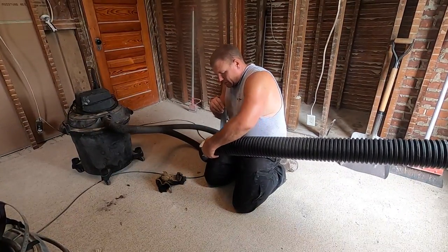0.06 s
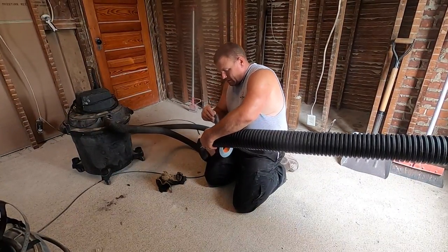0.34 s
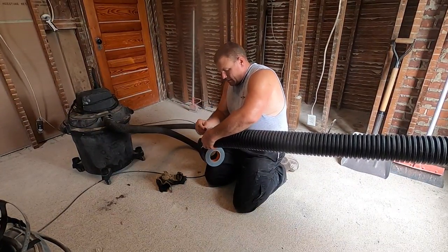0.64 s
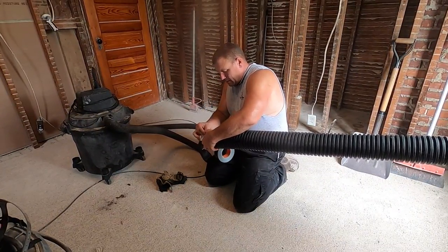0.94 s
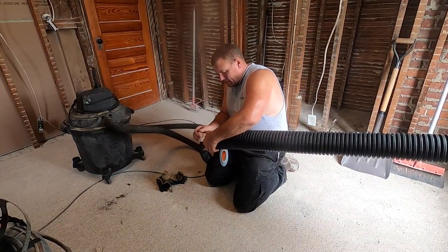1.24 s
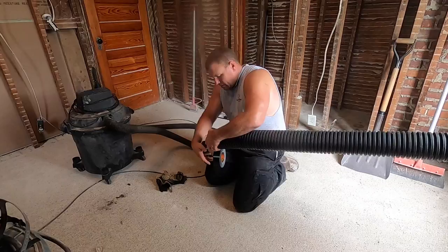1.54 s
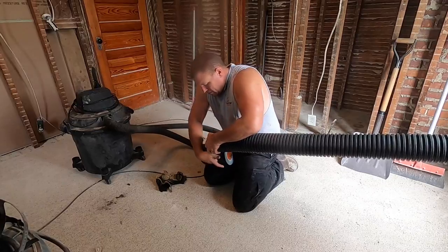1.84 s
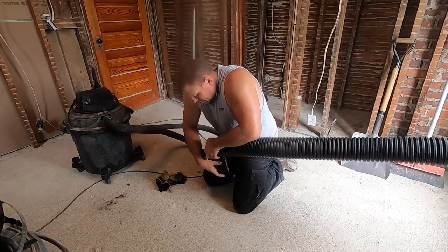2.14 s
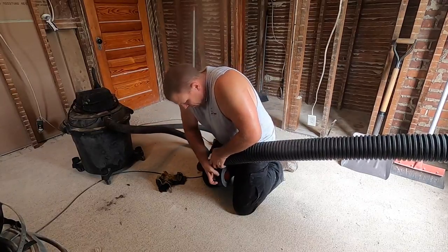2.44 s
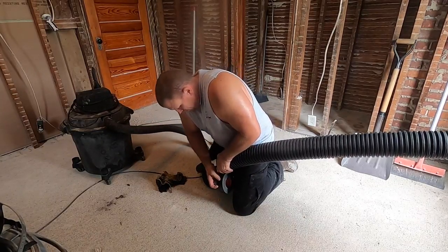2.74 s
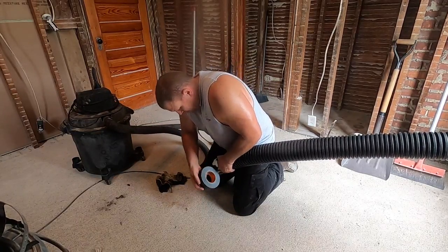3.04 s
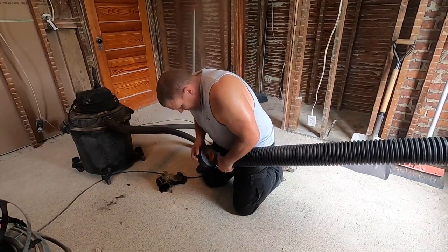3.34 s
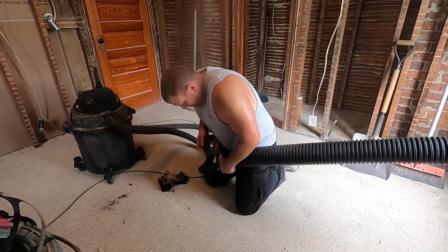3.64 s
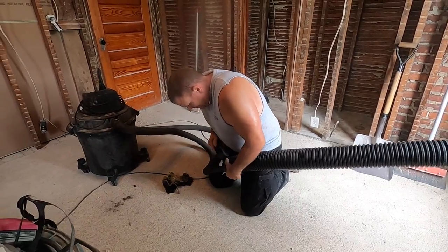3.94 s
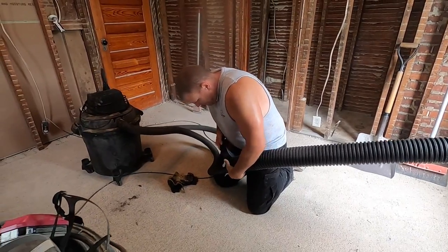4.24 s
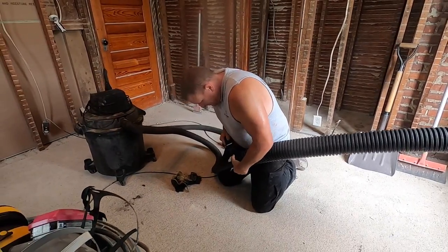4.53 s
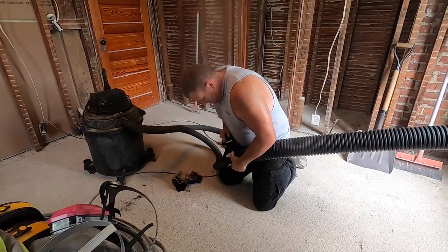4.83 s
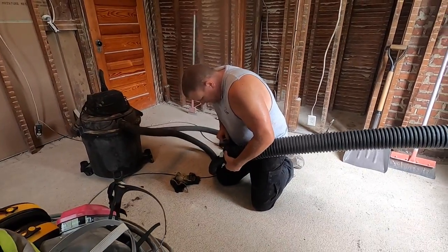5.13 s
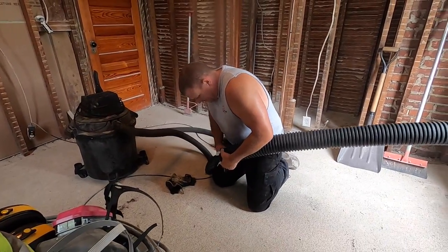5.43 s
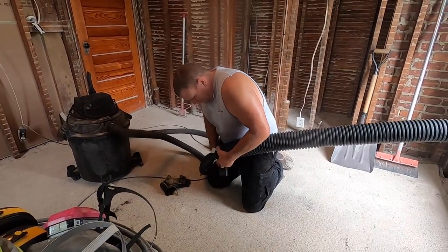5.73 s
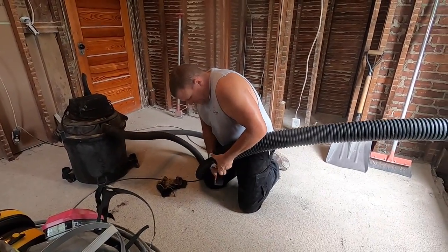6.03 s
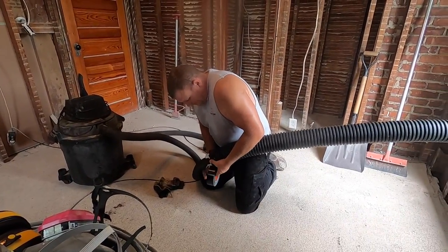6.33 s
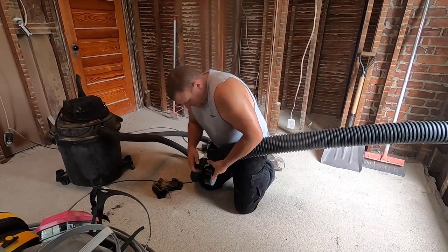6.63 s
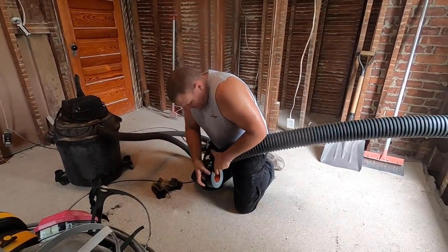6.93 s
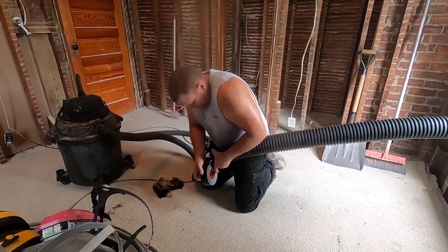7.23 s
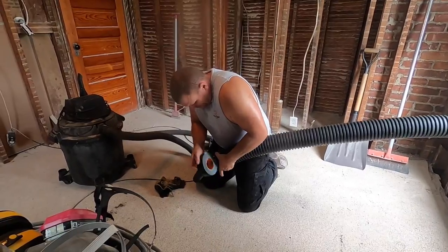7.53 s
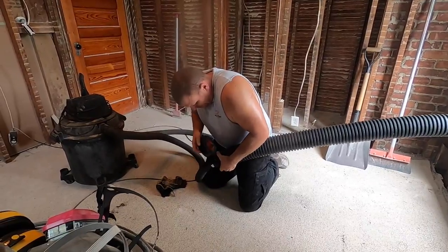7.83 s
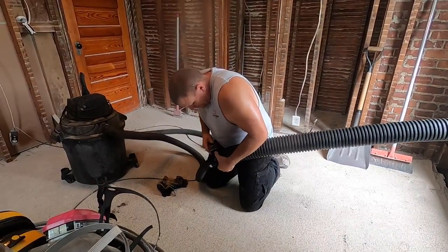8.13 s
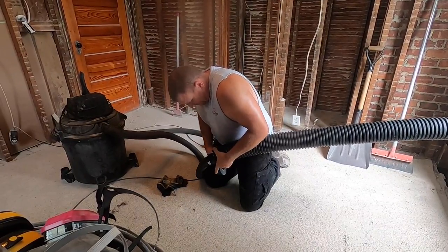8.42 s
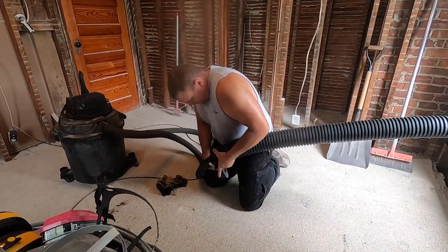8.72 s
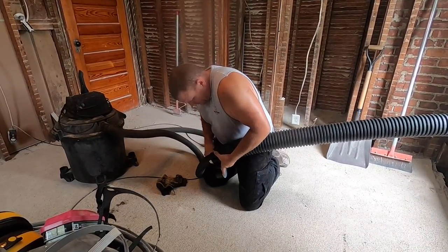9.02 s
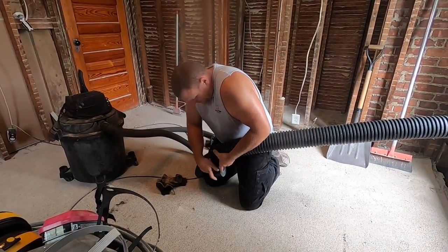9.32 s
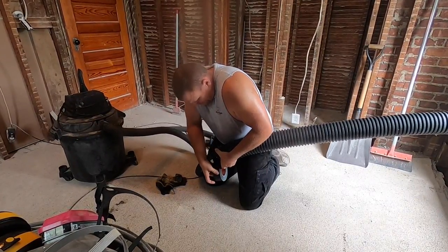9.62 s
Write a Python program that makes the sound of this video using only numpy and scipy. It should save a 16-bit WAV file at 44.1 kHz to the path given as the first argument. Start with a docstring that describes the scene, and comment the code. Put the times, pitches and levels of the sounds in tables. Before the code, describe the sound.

Duct tape is wound round the joint of a vacuum hose and a ribbed plastic pipe. Quiet rustling, scuffs and picking clicks come first, then uneven clusters of brief rips and dry snaps, mixed with dull knocks and a low rumble from the shifting pipe. The last rips are weaker, and the handling settles into light clicks and bumps. The microphone is fairly near, in a quiet, slightly echoing room.

```python
"""Duct tape is wound round the joint of a vacuum hose and a corrugated plastic pipe in a bare room.
First hands and clothes rustle, the long pipe rumbles and bumps, and fingers pick at the roll.
From 2.7 s the tape comes off in short rips: bursts of tiny slips that ring the free strip and the pipe,
with snaps and handling in between. At 8.3 s the tape squeaks faintly on the plastic, just ahead of
the last rips. The final second settles into soft bumps, clicks and rustle."""
import sys
import numpy as np
from scipy import signal
from scipy.fft import rfft, irfft, next_fast_len
from scipy.io import wavfile

SR = 44100
rng = np.random.default_rng(int(sys.argv[2]) if len(sys.argv) > 2 else 0)


def file_out(sig):
    """Save sig as 16-bit WAV at sys.argv[1]."""
    # one column per channel
    cols = np.atleast_2d(sig).T
    # limit, then scale
    lim = np.clip(cols, -1, 1)
    pcm = np.round(lim * 32767).astype(np.int16)
    wavfile.write(sys.argv[1], SR, pcm)


N = 426447
T = np.arange(SR // 6) / SR  # time within one hit [s]
SLOW = np.arange(0, N, 64) / SR  # time for slow envelopes [s]


def amp(db):
    """Decibels to gain."""
    return 10 ** (np.asarray(db) / 20)


def unit(x):
    """Scale to rms 1."""
    return x / np.sqrt(np.mean(x ** 2) + 1e-20)


def lasting(x, seconds):
    """Scale to the energy of a sound of rms 1 that lasts so long."""
    return x * np.sqrt(seconds * SR / (np.sum(x ** 2) + 1e-20))


def along(points, hz):
    """Read a curve of (frequency, value) points on a log frequency axis."""
    freqs, values = np.transpose(points)
    return np.interp(np.log(hz + 1), np.log(freqs), values)


def wobble(rate):
    """A random modulator that ramps to a new value rate times a second."""
    return np.interp(np.arange(N) * rate / SR, np.arange(4096), rng.standard_normal(4096))


def held(s, length, rise, fall_db_per_s):
    """An attack, hold and release envelope from time s."""
    attack = np.clip((SLOW - s) / rise, 0, 1)
    return attack * amp(-fall_db_per_s * np.maximum(SLOW - s - length, 0))


def swell(middle, length, fade_db):
    """An envelope that peaks at its middle, with its ends fade_db lower."""
    return amp(-fade_db * np.minimum((2 * (SLOW - middle) / length) ** 2, 20))


def together(rest_db, envelopes):
    """Slow envelopes added in power over a resting level, one value per sample."""
    power = amp(rest_db) ** 2 + sum(e ** 2 for e in envelopes)
    return np.interp(np.arange(N) / SR, SLOW, np.sqrt(power))


def filtered(x, response):
    """EQ x with a response given as a function of frequency."""
    n = x.shape[-1]
    size = next_fast_len(n + SR // 10, True)
    return irfft(rfft(x, size) * response(np.fft.rfftfreq(size, 1 / SR)), size)[..., :n]


def causal(spectrum, size=2048):
    """The tightest (minimum-phase) impulse response with this spectrum."""
    gain = amp(along(spectrum, np.fft.rfftfreq(size, 1 / SR)))
    cepstrum = irfft(np.log(gain))
    cepstrum[1:size // 2] *= 2
    cepstrum[size // 2 + 1:] = 0
    return irfft(np.exp(rfft(cepstrum)))


def through(x, impulse):
    """Play x through an impulse response."""
    return signal.fftconvolve(x, impulse)[:len(x)]


def resonance(f, hz, width):
    """Response of one damped mode."""
    return 1j * f * width / (hz * hz - f * f + 1j * f * width)


def ring(x, modes, top_hz=3000):
    """Play x through a body with these modes; its soft wall passes little treble."""
    def body(f):
        return sum(amp(db) * resonance(f, hz, width) for hz, width, db in modes) / (1 + 1j * f / top_hz)
    return filtered(x, body)


def gliding(x, hz, width_hz):
    """Play x through a swept resonance."""
    turn = np.exp(2j * np.pi * np.cumsum(hz) / SR)
    pole = np.exp(-np.pi * width_hz / SR)
    return np.real(turn * signal.lfilter([1], [1, -pole], x / turn))


def scattered(count, scatter_db):
    """Random gains around 1, without extreme spikes."""
    return amp(scatter_db * np.clip(rng.standard_normal(count), -2, 2))


def slip_train(rate, scatter_db, count=600):
    """Sudden slips of uneven size and direction, about rate a second, the first at time 0."""
    gaps = rng.gamma(2, .5, count) / rate
    onsets = ((np.cumsum(gaps) - gaps[0]) * SR).astype(int)
    slips = scattered(count, scatter_db) * rng.choice([-1, 1, 1], count)
    return np.bincount(onsets, slips, len(T))[:len(T)]


def add(out, s, x):
    """Mix x into out from time s on."""
    part = out[:, round(s * SR):][:, :x.shape[1]]
    part += x[:, :part.shape[1]]


# Stereo width of diffuse sound: (frequency [Hz], side over mid [dB])
WIDTH = [(100, -21.5), (250, -14.5), (500, -7.5), (1000, -9), (2000, -3), (4000, -4.5), (10000, 1.5)]


def diffuse(pair):
    """Two unrelated signals as a close microphone pair hears them: narrow bass, wide treble."""
    side = filtered(pair[1], lambda f: amp(along(WIDTH, f)))
    return np.array([pair[0] + side, pair[0] - side])


def noise(spectrum, grit_db=0):
    """A stereo noise bed with its mid at rms 1; grit breaks it into small grains."""
    grains = np.repeat(amp(grit_db * rng.standard_normal(N // 64 + 1)), 64)[:N]
    source = grains * rng.standard_normal((2, N))
    return diffuse(unit(filtered(source, lambda f: amp(along(spectrum, f)))))


# Reverb of the bare room: (frequency [Hz], time to fall 60 dB [s])
ROOM = [(150, .42), (500, .32), (1400, .29), (3700, .29), (9700, .27)]


def in_room(x, wet_db, build_s=0.0011):
    """The direct sound plus a dense tail from floor and walls, at the energy of the dry sound."""
    hz, t, bands = signal.stft(rng.standard_normal((2, SR // 4)), SR, nperseg=256)
    decay = amp(-60 * t / along(ROOM, hz)[:, None])
    tail = signal.istft(bands * decay, SR, nperseg=256)[1]
    tail *= 1 - np.exp(-(np.arange(tail.shape[1]) / SR / build_s) ** 2)
    impulse = amp(wet_db) * diffuse(tail / np.linalg.norm(tail[0]))
    impulse[:, 0] += 1
    heard = signal.fftconvolve(x[None], impulse, axes=1)
    return heard * np.linalg.norm(x) / np.linalg.norm(heard.mean(0))


# Colour of the still room: (frequency [Hz], level [dB])
ROOM_TONE_EQ = [(25, -6.5), (60, -15), (100, -15.5), (220, -4), (400, -19), (800, -19), (1200, -18),
                (3000, -32.5), (7000, -32.5), (10000, -49), (15000, -62)]


def room_tone(db=-74):
    """The faint, steady hush of the room."""
    return amp(db) * noise(ROOM_TONE_EQ)


# Colour of one tiny catch, in a crinkle or a scuff: (frequency [Hz], level [dB])
GRIT_EQ = [(300, -21.5), (800, -6), (1500, 3), (3000, -3.5), (5000, -3.5), (8000, -5.5), (10500, -21.5),
           (15500, -32)]


def crinkles(count=200, scatter_db=5):
    """Folds of tape and cloth flick over at random moments."""
    flicks = np.bincount(rng.integers(0, N, count), scattered(count, scatter_db), N)
    return in_room(unit(through(flicks, causal(GRIT_EQ))), wet_db=6.5)[:, :N]


# Colour of rubbing cloth: (frequency [Hz], level [dB])
CLOTH_EQ = [(240, -22), (400, 2), (481, -5), (569, -1), (653, -5), (847, -7.5), (1020, 2), (1100, 0),
            (1820, 2), (5820, -7.5), (7910, -18), (12100, -34.5), (14400, -52), (15500, -43.5)]
# Strokes of hands and clothes: (middle time [s], length [s], level [dB])
RUBS = [(0.135, 0.51, -59), (0.653, 0.42, -71), (1.03, 0.36, -67.5), (1.718, 0.42, -63.5),
        (2.099, 0.19, -65), (2.518, 0.47, -53), (2.86, .2, -65), (3.23, 0.26, -59), (3.476, .2, -67.5),
        (3.857, 0.36, -60), (4.394, 0.49, -64), (4.652, 0.23, -60), (4.895, 0.23, -62), (5.335, 0.78, -64),
        (5.865, 0.24, -60), (6.148, 0.31, -61), (6.346, 0.44, -69.5), (6.796, 0.102, -68.5),
        (6.928, 0.21, -57.5), (7.214, 0.21, -56), (8.322, 0.28, -60.5), (8.88, 0.24, -63),
        (9.62, 0.21, -65)]


def rustle(idle_db=-77.5, crinkle_db=-7):
    """Hands and clothes brush over tape and pipe: swells of fluttering, crinkly noise."""
    strokes = together(idle_db, (amp(db) * swell(s, length, fade_db=13.5) for s, length, db in RUBS))
    flutter = amp(0.81 * wobble(49))
    texture = noise(CLOTH_EQ, grit_db=1.5) + amp(crinkle_db) * crinkles()
    return strokes * flutter * texture


# Colours of the pipe's sub-bass sway and of its ribs' rumble: (frequency [Hz], level [dB])
SWAY_EQ = [(12, 2.5), (27, 4.5), (42, -6.5), (58, 0.5), (78, -16), (110, -20), (250, -89.5)]
RUMBLE_EQ = [(50, -20.5), (90, -8.5), (130, 5.5), (180, 0), (225, -2.5), (290, -0.5), (370, -13.5),
             (600, -27.5), (1500, -69)]
# Shoves that shift the pipe: (time [s], length [s], sway level [dB], rumble level [dB])
SHOVES = [(0.032, 0.2, -40, -54.5), (0.418, 0.078, -48.5, -76), (.75, 0.51, -56, -67),
          (1.22, 0.055, -46, -72), (1.497, 0.28, -54.5, -87), (2.288, 0.54, -52.5, -60),
          (2.961, 0.34, -38.5, -50), (3.59, .18, -40, -49.5), (4.198, 0.15, -37, -46),
          (4.442, 0.052, -45.5, -59), (4.654, .29, -39.5, -47.5), (5.162, 0.062, -36, -42.5),
          (5.58, 0.23, -36.5, -45), (5.84, 0.2, -42.5, -49.5), (6.863, 0.17, -64, -62.5),
          (7.239, 0.11, -33, -38), (7.599, 0.49, -43, -52), (8.443, 0.089, -48, -62),
          (8.937, 0.071, -36.5, -47.5), (9.169, 0.036, -60.5, -56)]


def pipe_shoves(rest_sway_db=-61, rest_rumble_db=-71.5):
    """The long pipe sways, slow to start and to settle; its dragging ribs rumble and stop sooner."""
    sways, drags = [], []
    for s, length, sway_db, rumble_db in SHOVES:
        sways.append(amp(sway_db) * held(s, length, rise=0.064, fall_db_per_s=87.5))
        drags.append(amp(rumble_db) * held(s, length, rise=0.02, fall_db_per_s=119))
    sway = together(rest_sway_db, sways) * noise(SWAY_EQ)
    rumble = together(rest_rumble_db, drags) * amp(0.5 * wobble(45)) * noise(RUMBLE_EQ)
    return sway + rumble


# Hollow body of the pipe, also rung by snaps and rips: (frequency [Hz], bandwidth [Hz], level [dB])
PIPE_MODES = [(217, 7.5, -.5), (267.4, 31, -1), (366, 114, -0.5), (433.6, 21, -1), (488, 39, -1),
              (576, 53, -2), (639, 16, -5.5), (872, 12, -6)]
# Dull bumps of the pipe against hand and knee: (time [s], level [dB], pitch [Hz])
BUMPS = [(.071, -43.5, 119), (.146, -45.5, 205), (1.765, -60.5, 205), (2.965, -31.5, 132),
         (3.701, -48, 128), (4.218, -32, 118), (4.683, -40.5, 139), (4.814, -39, 128), (4.975, -40.5, 167),
         (5.933, -33, 144), (7.162, -44.5, 189), (7.295, -27.5, 150), (8.371, -35.5, 233), (8.73, -50, 167),
         (8.956, -40.5, 168), (9.005, -36.5, 124), (9.183, -49, 189.5)]


def bumps(cues, decay_s=0.017, rise_s=0.0028, breadth=0.58, ring_db=-1):
    """A soft shove makes the pipe wall boom briefly and stirs its lowest modes."""
    out = np.zeros((2, N))
    for s, db, hz in cues:
        shove = rng.standard_normal(len(T)) * np.exp(-T / decay_s) * (1 - np.exp(-T / rise_s))
        boom = filtered(shove, lambda f: resonance(f, hz, breadth * hz) ** 2)
        bump = lasting(boom + amp(ring_db) * ring(boom, PIPE_MODES), 0.018)
        add(out, s, in_room(amp(db) * bump, wet_db=-7.5))
    return out


# Colour of a snap: (frequency [Hz], level [dB])
SNAP_EQ = [(150, -9), (500, 7.5), (1400, 0.5), (3500, 2), (5000, -2.5), (8000, -5), (10500, -15),
           (15500, -31.5)]
# Single snaps of the tape and clicks of the pipe's ribs: (time [s], level [dB], pitch [Hz])
SNAPS = [(.484, -43.5, 3500), (.599, -44, 2500), (.678, -37, 1700), (.815, -33, 1900), (1.01, -41, 1900),
         (1.098, -28.5, 2800), (1.277, -39.5, 2400), (1.68, -26.5, 2870), (2.252, -41, 1900),
         (3.12, -38, 1500), (3.249, -20.5, 2600), (3.967, -21.5, 3500), (3.99, -22, 900),
         (4.261, -19.5, 1850), (4.905, -35.5, 3500), (5.329, -37.5, 1600), (5.791, -31.5, 2300),
         (5.593, -15.5, 2220), (5.9, -18, 1620), (7.294, -13.5, 1600), (7.516, -22.5, 1300),
         (7.776, -15.5, 1300), (7.926, -15.5, 1690), (8.369, -21.5, 900), (8.8, -35.5, 1250),
         (9.182, -35.5, 1400), (9.551, -36.5, 3200)]


def snaps(cues, decay_s=.0028, breadth=0.78, trail_gain=0.38, crack_s=0.0002, knock_db=-13):
    """One sudden slip with a few small ones trailing it: a dry crack and a knock in the pipe."""
    out = np.zeros((2, N))
    colour = causal(SNAP_EQ)
    for s, db, hz in cues:
        burst = trail_gain * slip_train(rate=1700, scatter_db=6.5) * np.exp(-T / decay_s)
        burst[0] = 1  # the leading slip
        crack = filtered(through(burst, colour), lambda f: resonance(f, hz, breadth * hz))
        knock = amp(knock_db) * lasting(ring(burst, PIPE_MODES), crack_s)
        add(out, s, in_room(amp(db) * (lasting(crack, crack_s) + knock), wet_db=-1.5))
    return out


# Brief scrapes of fingers and hose: (time [s], stroke length [s], level [dB], pitch [Hz])
SCUFFS = [(0.807, .03, -54, 2300), (1.001, 0.019, -54, 4500), (1.078, 0.04, -48.5, 3500),
          (1.437, 0.34, -71, 6000), (1.654, 0.062, -55, 3500), (2.102, 0.44, -74, 5450),
          (2.695, 0.062, -48.5, 2000), (3.237, 0.024, -57, 3500), (4.203, 0.079, -48, 2000),
          (4.498, .03, -58.5, 2390), (4.71, 0.034, -58.5, 2050), (4.792, .04, -61.5, 2200),
          (4.907, 0.019, -62, 3800), (5.8, 0.045, -58, 2600), (6.917, .05, -56, 2180),
          (7.054, 0.062, -64, 5800), (8.94, 0.077, -55, 2180), (9.388, .069, -67, 5000)]


def scuffs(breadth=0.75):
    """A short stroke swells and fades over many tiny catches; the longest are cut off at 1/6 s."""
    out = np.zeros((2, N))
    colour = causal(GRIT_EQ)
    for s, length, db, hz in SCUFFS:
        stroke = np.sin(np.pi * np.minimum(T / length, 1))
        catches = through(stroke * slip_train(rate=1200, scatter_db=5.5), colour)
        scrape = filtered(catches, lambda f: resonance(f, hz, breadth * hz))
        add(out, s, in_room(amp(db) * lasting(scrape, length), wet_db=0.0))
    return out


# Colours of the tape sheet and of the crackle at the peel line: (frequency [Hz], level [dB])
TAPE_EQ = [(100, -22.5), (300, -3), (520, 0.5), (770, -2.5), (1050, 0), (1600, 0.5), (2000, 1.5),
           (3000, -5), (5000, -21), (9000, -45), (15000, -91)]
CRACKLE_EQ = [(300, -25), (1200, 2), (2000, 5), (2600, 6.5), (3500, 4), (4500, -4.5), (6000, -8.5),
              (8000, -16), (10000, -29), (13000, -49), (15500, -58.5)]
# Body of the roll's cardboard core: (frequency [Hz], bandwidth [Hz], level [dB])
CORE_MODES = [(980, 50, 0), (1153, 35, -3.5), (1243, 30, -1.5), (1431, 22, 4), (1660, 74, 3), (2514, 48, 2),
              (3107, 120, 4)]
# Pulls on the roll: (time [s], length [s], level [dB], swell [dB], crackle mix [dB], pipe mix [dB],
# strip's starting pitch [Hz], opening snap level [dB], boom level [dB])
RIPS = [ (2.745, 0.0084, -39, 0, 5, -11.5, 593, -28.5, -42),
        (2.900, .024, -29.5, 3.5, -8.5, 2, 1300, -16, -35.5),
        (2.967, 0.022, -27, -1, -8, -6, 1050, -12.5, -33),
        (3.515, 0.038, -25.5, 7.5, -4, -6, 1320, -8, -27), (3.952, .041, -46, 6, 7.5, -21, 1330, -15, -51),
        (5.059, 0.072, -32.5, 3.5, -3, -3, 670, -20, -25),
        (5.440, 0.0062, -34.5, 2, -2, 8.5, 1280, -14.5, -36),
        (5.524, 0.044, -32.5, -1, 0.5, 0.5, 754, -25, -21.5),
        (5.931, 0.02, -32.5, -3.5, -5.5, -0.5, 1150, -27, -32.5),
        (7.257, 0.054, -27.5, -1, -3, -7, 1380, -16, -22.5),
        (7.569, .038, -27, 1.5, -3, -3, 1130, -20, -38.5),
        (7.801, 0.023, -31.5, 8.5, 2.5, -4, 1180, -16, -36),
        (7.95, 0.088, -31, 0.5, 1, -2.5, 607, -18, -46), (8.382, .030, -39.5, 0, 7, -5, 1440, -15.5, -45.5),
        (8.549, 0.068, -40.5, -5, 8, -21, 1340, -14, -62),
        (8.660, 0.03, -43.5, -1, 5.5, -5, 1810, -47, -69)]


def rips(sheet_db=-2, strip_db=-4, core_db=-7.0, release_s=0.0097, end_pitch_ratio=0.71):
    """The glue lets go in uneven slips; the freed strip lengthens, so its ring falls."""
    out = np.zeros((2, N))
    tape_colour, crackle_colour = causal(TAPE_EQ), causal(CRACKLE_EQ)
    for s, length, db, swell_db, crackle_db, pipe_db, start_hz, _, _ in RIPS:
        progress = np.minimum(T / length, 1)
        tension = np.exp(-np.maximum(T - length, 0) / release_s)
        slips = slip_train(rate=800, scatter_db=3.0) * tension
        # the longer strip radiates more of the low range; the crackle follows only half the swell
        pull = slips * amp(swell_db * progress)
        crackle = through(slips * amp(.5 * swell_db * progress), crackle_colour)
        sheet = through(pull, tape_colour)
        strip = gliding(sheet, start_hz * end_pitch_ratio ** progress, width_hz=390)
        core = ring(sheet, CORE_MODES)
        # the pipe is shaken harder as the strip comes taut
        hollow = ring(pull * amp(6.3 * progress), PIPE_MODES)
        layers = [(sheet_db, sheet), (strip_db, strip), (core_db, core),
                  (crackle_db, crackle), (pipe_db, hollow)]
        rip = sum(amp(db + mix_db) * lasting(layer, length) for mix_db, layer in layers)
        add(out, s, in_room(rip, wet_db=-4.5))
    return out


def pull_snaps(open_hz=1667, crackle_db_per_octave=16, long_pull_s=.042, catch_db=19, catch_hz=1050):
    """Snap cues: the glue breaks as each pull opens, and a long pull ends with a catch."""
    cues = []
    for s, length, db, _, crackle_db, _, _, open_db, _ in RIPS:
        octaves = crackle_db / crackle_db_per_octave  # more crackle, brighter snap
        cues.append((s, open_db, open_hz * 2 ** octaves))
        if length > long_pull_s:
            cues.append((s + length, db + catch_db, catch_hz))
    return cues


def pull_booms(boom_hz=238.4):
    """Bump cues: each pull jerks the pipe halfway through."""
    return [(s + length / 2, boom_db, boom_hz) for s, length, *_, boom_db in RIPS]


def squeak(s=8.285, length=0.0531, db=-61, start_hz=1230, end_hz=780):
    """Tape sliding on plastic gives one faint falling squeak."""
    out = np.zeros((2, N))
    progress = np.minimum(T / length, 1)
    hz = start_hz * (end_hz / start_hz) ** progress
    chirp = np.sin(np.pi * progress) * np.sin(2 * np.pi * np.cumsum(hz) / SR)
    add(out, s, in_room(amp(db) * lasting(chirp, length), wet_db=-6))
    return out


def scene():
    """A bed of room tone and handling, with the hits of pipe and tape on top."""
    bed = room_tone() + rustle() + pipe_shoves()
    return bed + bumps(BUMPS + pull_booms()) + snaps(SNAPS + pull_snaps()) + scuffs() + rips() + squeak()


# Balance of the microphone pair: (frequency [Hz], left over right [dB])
BALANCE = [(500, -0.5), (1000, 0), (2000, 0.8), (4000, 1.9), (8000, -3.5), (12000, -1)]
# Phase between the microphones: (frequency [Hz], lag of the left [rad])
LEFT_LAG = [(100, 0.015), (600, 0.088), (1640, 0.5), (2400, 0.18), (6000, 1), (10000, 1)]


def record(dry, top_hz=15400):
    """The two microphones differ a little in colour, the right hears first, and the top is cut off."""
    sides = np.array([[.5], [-.5]])

    def microphones(f):
        colour = amp(sides * along(BALANCE, f))
        lag = np.exp(-1j * sides * along(LEFT_LAG, f))
        return colour * lag * (f < top_hz)
    return filtered(dry, microphones)


dry = scene()
out = record(dry)
file_out(out)
```